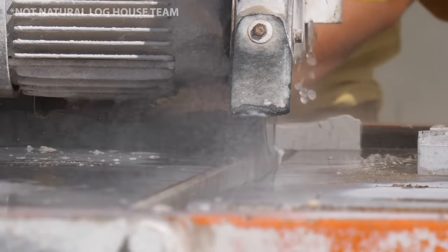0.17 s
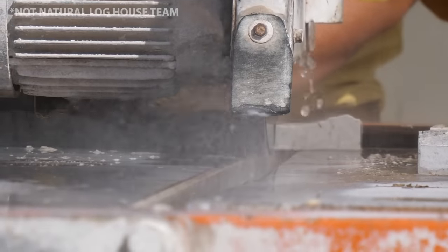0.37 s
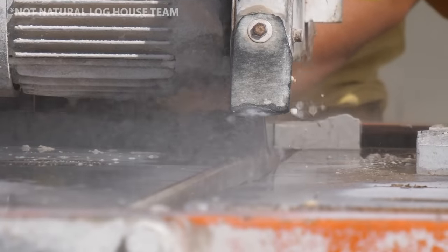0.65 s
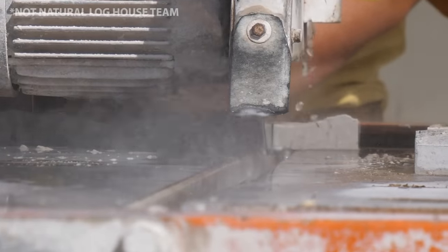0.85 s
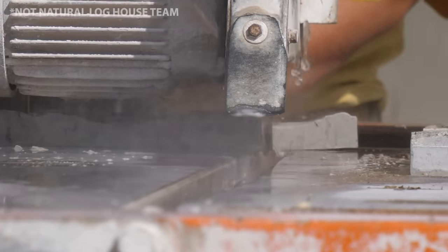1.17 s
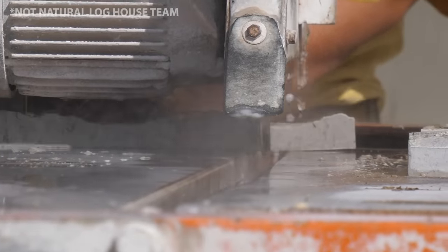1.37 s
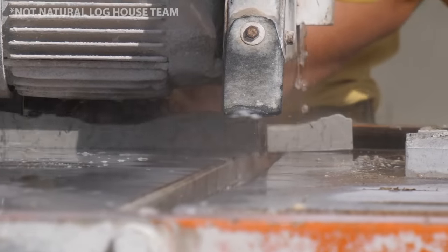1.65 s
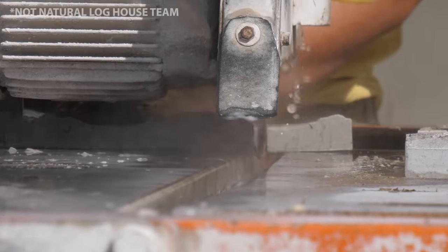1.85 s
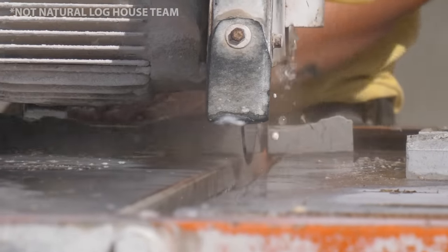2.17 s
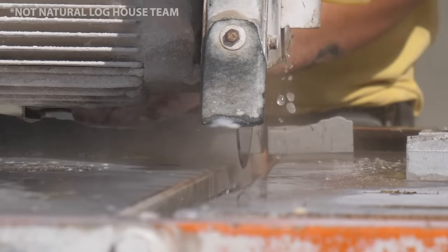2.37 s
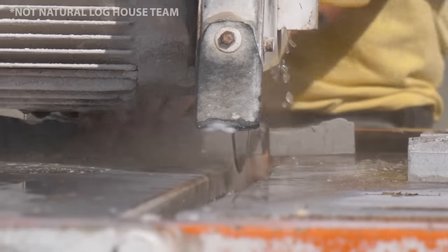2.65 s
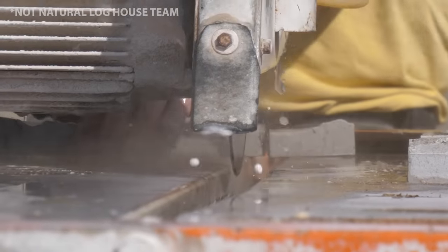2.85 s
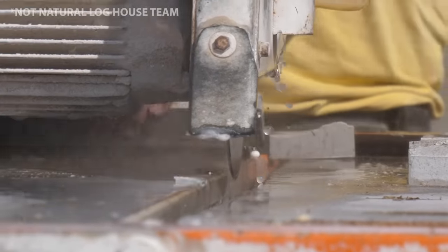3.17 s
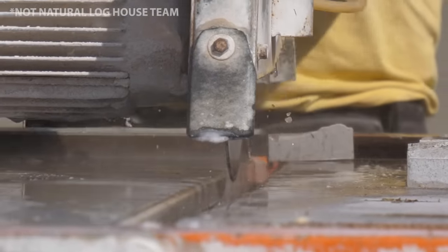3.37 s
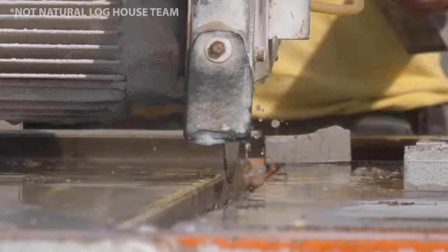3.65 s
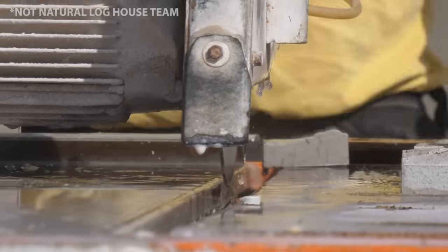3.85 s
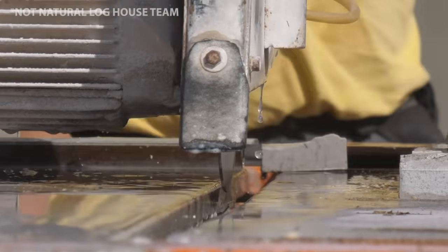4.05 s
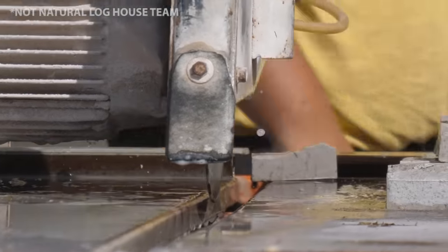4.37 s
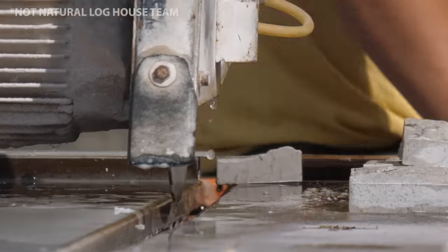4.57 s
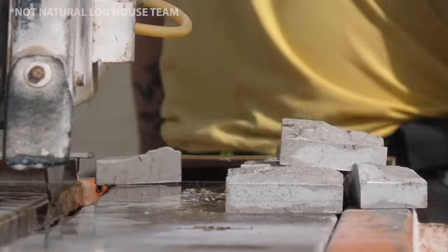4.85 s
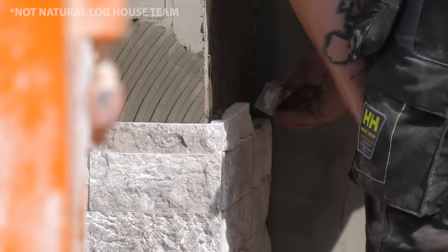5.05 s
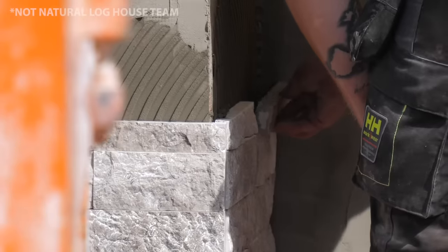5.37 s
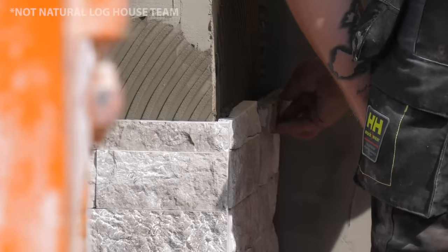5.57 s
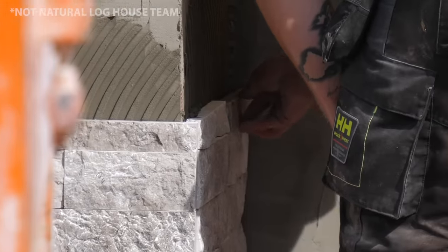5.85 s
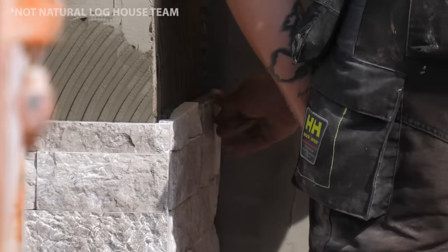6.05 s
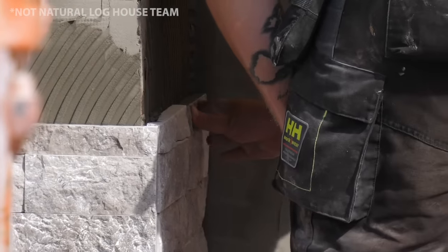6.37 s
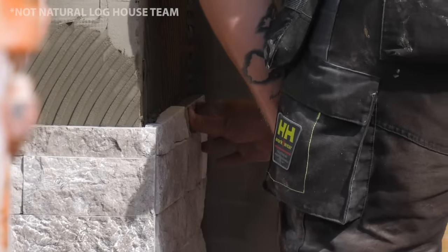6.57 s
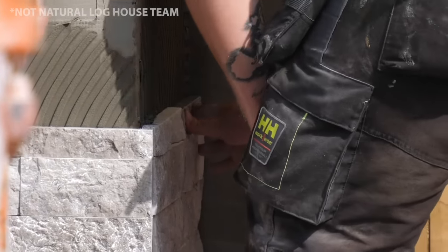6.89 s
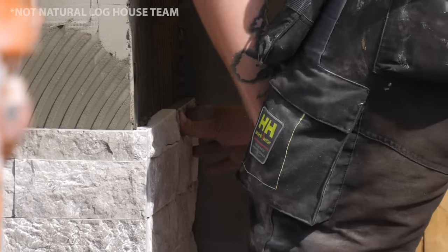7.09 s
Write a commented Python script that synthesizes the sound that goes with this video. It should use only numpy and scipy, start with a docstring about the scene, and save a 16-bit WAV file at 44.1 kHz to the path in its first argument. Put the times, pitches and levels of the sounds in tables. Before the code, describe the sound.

A wet tile saw hisses and rings through two stone cuts, with a short idle, a knock and wind between them.

```python
"""Outdoors, a wet tile saw. It grinds under load, the blade runs out ringing and idles in its spray,
stone knocks on the tray, then a second, shriller cut drags the shaft speed down and ends. Grit under
the rim hisses and rings the blade; motor, belt and rim slots hum at multiples of the shaft speed.
Wind buffets the microphone ports, and a far hum with faint tones is left."""
import sys
import numpy as np
from scipy import signal
from scipy.fft import rfft, irfft, next_fast_len
from scipy.io import wavfile

SR = 44100
rng = np.random.default_rng(int(sys.argv[2]) if len(sys.argv) > 2 else 0)


def persist_wave(psi):
    """Save psi, clipped to +-1, as 16-bit WAV."""
    counts = np.round(np.clip(psi, -1, 1) * 32767).astype(np.int16)
    wavfile.write(sys.argv[1], SR, np.atleast_2d(counts).T)


N = 318402
TIME = np.arange(N) / SR
IDLE, SECOND_CUT = 2, 3   # saw stages; 0 is the first cut, 1 the run-out
# shaft speed: t/s, speed/(turns/s)
SHAFT_SPEED = [(1.18, 48.83), (1.24, 49.66), (1.9, 49.68), (2.1, 49.85), (3.08, 49.85), (3.27, 64.3),
               (3.45, 65.5), (3.6, 64.0), (4.05, 57.7), (4.5, 52.0), (4.85, 48.8), (5.26, 49.2),
               (5.29, 42.3), (5.55, 42.4), (5.7, 45), (6.2, 45.2)]
# grinding envelope, per stage: t/s, level/dB
GRINDING = [
    [(0, -27.5), (1.2, -29.5)],
    [(1.2, -27.5), (1.88, -28), (1.97, -36), (2.06, -45)],
    [(2.06, -43), (2.4, -35.5), (3.04, -32.5), (3.1, -38.5)],
    [(3.1, -39), (3.26, -39), (3.285, -33.5), (3.65, -30), (3.9, -29.5), (3.925, -26.5), (4.1, -29),
     (5.62, -28.5), (5.73, -30), (6.0, -28.5), (6.08, -40), (6.17, -56.5), (6.45, -74)],
]


def amp(db):
    """dB to gain."""
    return 10 ** (np.asarray(db) / 20)


def unit_rms(x):
    """Scale to rms 1."""
    return x / np.sqrt(np.mean(x ** 2) + 1e-20)


def at_time(points, t, **ends):
    """Read a curve on a linear time axis."""
    return np.interp(t, *np.transpose(points), **ends)


def at_hz(points, hz):
    """Read a spectrum on a log-frequency axis."""
    points_hz, values = np.transpose(points)
    return np.interp(np.log(hz), np.log(points_hz), values)


def drift(rate_hz, size):
    """Slow random wander, rms about 1: coarse noise through a double one-pole low-pass."""
    hop, settle = 40, 2000
    r = np.exp(-2 * np.pi * rate_hz * hop / SR)
    slow = signal.lfilter([1], [1, -2 * r, r * r], rng.standard_normal(size // hop + settle + 2))[settle:]
    return np.interp(np.arange(size) / hop, np.arange(len(slow)), unit_rms(slow))


def bandpass(x, hz, width_hz):
    """Two-pole band-pass, peak gain 1."""
    r = np.exp(-np.pi * width_hz / SR)
    poles = [1, -2 * r * np.cos(2 * np.pi * hz / SR), r * r]
    return signal.lfilter([1, 0, -1], poles, x) * (1 - r * r) / 2


def resonance(x, hz, width_hz):
    """Band-pass scaled to rms 1."""
    return unit_rms(bandpass(x, hz, width_hz))


def spread(mid, side, hz):
    """Left and right from a shared and an opposed part."""
    # left-right likeness: f/Hz, correlation
    likeness = [(40, 1), (500, 0.97), (1500, 0.84), (8000, 0.89), (13000, 0.73)]
    # balance: f/Hz, left minus right/dB
    lean = [(700, -0.7), (2500, 0.3)]
    alike, sign = at_hz(likeness, hz), np.array([[1], [-1]])
    pair = np.sqrt((1 + alike) / 2) * mid + np.sqrt((1 - alike) / 2) * side * sign
    return amp(sign * at_hz(lean, hz) / 2) * pair


def coloured(white, spectrum, flicker_db, tilt_db_oct):
    """Shape two noises to a spectrum, in overlapping half-octave stereo bands that flicker."""
    size = white.shape[-1]
    padded = next_fast_len(size)
    bins_hz = np.arange(1, padded // 2 + 2) * SR / padded
    shaped = rfft(white, padded) * amp(at_hz(spectrum, bins_hz))
    out, common = 0, drift(1.07, size)
    for hz in 45 * 2 ** np.arange(0, 9, .5):
        share = np.cos(np.pi * np.clip(np.log2(bins_hz / hz), -.5, .5)) ** 2   # neighbours sum to 1
        band = irfft(shaped * share, padded)[:, :size]
        gain_db = tilt_db_oct * np.log2(max(hz, 800) / 3000)
        gain_db += flicker_db * (.89 * common + drift(17, size))
        out = out + amp(gain_db) * spread(*band, hz)
    return out / np.std(irfft(shaped[0], padded))


def rim_grit(stage, turns):
    """Grit under the rim: partly fresh, partly the same bumps each turn."""
    # repeating share of the power, per stage
    repeat = [.5, .45, .35, .65]
    count = 1200
    bumps = rng.standard_normal((2, 2, count))
    under = (turns % 1 * count).astype(int)
    wear_rad = 2.25 * drift(.393, len(turns))   # one bump pattern wears into another
    same = np.cos(wear_rad) * bumps[0][:, under] + np.sin(wear_rad) * bumps[1][:, under]
    fresh = rng.standard_normal((2, len(turns)))
    return np.sqrt(repeat[stage]) * same + np.sqrt(1 - repeat[stage]) * fresh


def grit_hiss(stage, grit, speed_hz, drop_db):
    """Grit and spray hiss: duller as the grinding drops, brighter as the second cut slows the shaft."""
    # hiss spectrum, per stage: f/Hz, relative density/dB
    spectra = [
        [(60, -36), (150, -11), (400, -6.5), (1000, -4), (2600, -7.5), (3300, -1), (5900, -4.5), (10500, -6),
         (15000, -19.5)],
        [(100, -52), (300, -22.5), (1000, -15.5), (1300, -6.5), (2600, -12), (3300, 0.5), (5900, -6),
         (10500, -5), (15000, -21)],
        [(80, -52), (250, -8), (450, -5.5), (800, -3.5), (3000, -4), (6000, -10.5), (11000, -8.5),
         (15000, -18.5)],
        [(100, -58), (400, -8), (850, 4), (2300, 6), (3000, 4), (6500, 1.5), (10500, 4.5), (15000, -4.5)],
    ]
    # treble tilt at full grinding level, per stage: dB/oct
    full_tilt = [1, 0.2, 0.14, 0.38]
    # tilt lost per dB of drop, per stage: dB/oct/dB
    dulling = [.05, 0.68, 0.21, 0.15]
    last = stage == SECOND_CUT
    labour_db_oct = last * .0413 * (speed_hz.mean() - speed_hz)
    tilt_db_oct = full_tilt[stage] + labour_db_oct - dulling[stage] * np.minimum(drop_db, 15)
    return amp(-2.5) * coloured(grit, spectra[stage], 1.13 + .25 * last, tilt_db_oct)


def idle_swell_db(stage, t, hz):
    """At idle the ring near one pitch swells, then passes from just above it to just below."""
    pivot_hz, peak_s, slope_db_s = 3550, 2.82, 11
    if stage != IDLE or abs(pivot_hz - hz) >= 350:
        return 0
    swell_db = 2 - slope_db_s * np.abs(np.maximum(t, 2.4) - peak_s)
    handover_db = 2 * np.tanh((t - peak_s) / .08)
    return swell_db + np.sign(pivot_hz - hz) * handover_db


def blade_ring(stage, t, grit, drop_db):
    """Grit drives the blade modes; each waxes and wanes."""
    # blade modes: f/Hz, width/Hz, then relative level/dB in each of the four stages
    modes = [(1143.6, 18, -44, -15, -23, -44), (2338, 12, -58, -46, -47, -15),
             (2392, 18, -60, -49, -40, -14.5), (2494, 16, -51, -42, -40, -19),
             (3311, 14, -18, -30, -40, -50), (3368, 18, -15, -21, -26, -57), (3470, 14, -19, -19, -28, -56),
             (3580, 14, -19, -19, -28, -50), (3730, 90, -18, -18, -21, -46), (4495, 55, -13, -16, -27, -40),
             (5300, 60, -21, -26, -32, -30), (5615, 20, -28, -21, -36, -45), (6175, 45, -18, -20, -32, -48),
             (9530, 360, -29, -37, -24, -24)]
    # higher, weaker modes: f/Hz
    upper_hz = [7840, 8400, 8400, 9240, 11500, 12740]
    upper_modes = [(hz, 250, -31, -29, -38, -35) for hz in upper_hz]
    held_db = .26 * drop_db * (stage != SECOND_CUT)   # the ring drops less than the grinding
    out = 0
    for hz, width_hz, *stage_db in modes + upper_modes:
        level_db = stage_db[stage] + idle_swell_db(stage, t, hz) + held_db + 1.7 * drift(3, len(t))
        out += amp(level_db) * spread(*[resonance(g, hz, width_hz) for g in grit], hz)
    return out


def shaft_hum(stage, t, turns, mean_speed_hz, drop_db):
    """Motor, belt and rim slots hum at shaft multiples; the slot tones flare as the blade bites."""
    # hum lines, per stage: shaft multiple, level re grinding/dB
    lines = [
        [(4, -15), (6, -22.5), (12, -25.5), (13, -19), (17, -17.5), (24, -16), (26, -25), (34, -26)],
        [(4, -19), (70, -18), (26, -24), (30, -26), (77, -19), (87, -22), (89, -19), (91, -20), (101, -22)],
        [(4, -18), (15, -21), (18, -21), (22, -20), (23, -20), (26, -24), (51, -22), (54, -22.5), (68, -19),
         (70, -22), (72, -22), (74, -17), (75, -21), (78, -21), (85, -25)],
        [(15, -15.5), (17, -19), (19, -19), (24, -10.5), (48, -16), (72, -20), (96, -23)],
    ]
    # slot-tone squeal in the second cut, other lines follow only its dips: t/s, gain/dB
    squeal = [(3.25, -14), (3.28, 4), (3.44, 2), (3.7, 5), (3.77, -2), (4.2, -4), (4.42, 2), (4.56, 3),
              (4.82, -4), (4.9, 3), (5.03, 3), (5.08, -14), (5.26, -14), (5.32, -1), (6.0, -12)]
    # share of a grinding drop that the hum does not follow, per stage
    hold = [0.12, 0.38, 0.74, 0.082]
    # fade of the low multiples, per stage: dB/s (negative grows)
    fade_db_s = [-4.5, 45, -0.5, 5.5]
    # flutter depth, per stage: dB
    flutter_db = [1.5, 2.5, 2.5, 4.2]
    # slot-tone phase wander before and in the second cut: rad
    wander_rad = [.15, .55]
    slots, bite_s, bite_decay_s = 24, 3.272, .05
    last = stage == SECOND_CUT
    squeal_db = last * at_time(squeal, t)
    bite_db = 4 * (t > bite_s) * np.exp(-np.abs(t - bite_s) / bite_decay_s)
    out = 0
    for order, db in lines[stage]:
        hz = order * mean_speed_hz
        level_db = db + hold[stage] * drop_db + idle_swell_db(stage, t, hz)
        level_db += squeal_db if order == slots else np.minimum(squeal_db, 0)
        if order < (slots if last else 10):
            level_db -= fade_db_s[stage] * (t - GRINDING[stage][0][0])
        if order % slots == 0:
            level_db += bite_db
        depth_db = flutter_db[stage] / (2 if last and order == slots else 1)
        level_db += depth_db * (.4 * drift(4, len(t)) + drift(14, len(t)))
        phase = 2 * np.pi * (order * turns + rng.random())
        phase += wander_rad[last] * order / slots * drift(20, len(t))
        out += np.sqrt(2) * amp(level_db) * spread(np.sin(phase), np.cos(phase), hz)
    return out


def guard(stage, x):
    """Sound off the blade guard cancels a few narrow bands, now more, now less."""
    # notches before and in the second cut: f/Hz
    notches_hz = [
        [2570, 4150, 5850, 6620],
        [3550, 4610, 5540],
    ]
    filled = 2 if stage == IDLE else 0   # the lowest two fill in at idle
    for hz in notches_hz[stage == SECOND_CUT][filled:]:
        depth = np.clip(.68 + .2 * drift(4, x.shape[1]), 0, 1)
        x = x - depth * bandpass(x, hz, width_hz=230)
    return x


def saw():
    """Hiss, ring and hum of one turning blade; its four stages cross-fade at equal power."""
    fade_s = .04
    speed_hz = at_time(SHAFT_SPEED, TIME)
    turns = np.cumsum(speed_hz) / SR
    out = np.zeros((2, N))
    for stage, envelope in enumerate(GRINDING):
        start_s, end_s = envelope[0][0], envelope[-1][0]
        span = (TIME > start_s - fade_s) & (TIME < end_s + fade_s)
        t = TIME[span]
        level_db = at_time(envelope, t)
        drop_db = max(db for _, db in envelope) - level_db
        grit = rim_grit(stage, turns[span])
        sound = grit_hiss(stage, grit, speed_hz[span], drop_db)
        sound += blade_ring(stage, t, grit, drop_db)
        sound += shaft_hum(stage, t, turns[span], speed_hz[span].mean(), drop_db)
        edge = np.clip(np.minimum(t - start_s, end_s - t) / fade_s + 1, 0, 2)
        edge[t < fade_s] = 2   # already cutting at t = 0
        out[:, span] += guard(stage, sound) * amp(level_db) * np.sin(np.pi / 4 * edge)
    return out


def far_machinery():
    """Steady far machinery and air, coming up as the recorder's automatic gain recovers after the saw."""
    # hum spectrum: f/Hz, relative density/dB
    spectrum = [(250, 2.5), (450, -1), (1000, 6.5), (2500, 2), (3300, -7.5), (4400, -3),
                (7000, -12.5), (10500, -11), (15000, -23)]
    # faint wavering tones: f/Hz, level at full gain/dB
    lines = [(565, -70), (1448, -71), (2605, -71), (4091, -74), (4430, -70), (5185, -79)]
    white = rng.standard_normal((2, N))
    tones = sum(amp(db) * spread(*[resonance(w, hz, width_hz=22) for w in white], hz) for hz, db in lines)
    recorder_gain_db = at_time([(5.9, -2.5), (6.82, 0)], TIME)   # the recovery, as a timed ramp
    hum = coloured(white, spectrum, flicker_db=2.5, tilt_db_oct=-recorder_gain_db / 2)
    return amp(recorder_gain_db) * (amp(-56.5) * hum + tones)


def wind():
    """Lumpy low noise on the microphone ports, and gusts that push them into a few slow swings."""
    # steady wind: t/s, level/dB
    steady = [(1.85, -72), (2.0, -51.5), (2.9, -50.5), (3.6, -55), (4.3, -76.5), (5.5, -78), (5.8, -62),
              (7.22, -66)]
    # main gusts: t/s, peak/dB, swing f/Hz
    main_gusts = [(2.925, -26, 172), (3.071, -30.5, 149), (3.11, -32.5, 168), (3.157, -37.5, 196),
                  (6.216, -46.5, 168), (6.476, -45, 182), (6.683, -44, 133), (7.127, -43, 119)]
    centre_hz, width_hz, floor_hz = 153, 115, 93
    rumble = [resonance(resonance(white, centre_hz, width_hz), centre_hz, 1.17 * width_hz)
              for white in rng.standard_normal((2, N))]
    rumble = signal.sosfilt(signal.butter(2, floor_hz, "high", fs=SR, output="sos"), rumble)
    out = spread(*rumble, centre_hz) * amp(at_time(steady, TIME, left=-100) + 7 * drift(4.8, N))
    when, pitch = rng.random((30, 2)).T   # small random gusts
    small_s = np.interp(when, [0, 1], [steady[0][0], N / SR])
    small_hz = np.interp(pitch, [0, 1], [115, 200])
    gusts = main_gusts + list(zip(small_s, at_time(steady, small_s) + 9, small_hz))
    t = np.arange(int(.2 * SR)) / SR
    for start_s, peak_db, hz in gusts:
        phase_turns, rise_s = rng.random(), rng.uniform(.0021, .0131)
        envelope = t / rise_s * np.exp(1 - t / rise_s)
        swing = np.sin(2 * np.pi * (hz * t * (1 - 2 * t) + phase_turns))   # slows as it dies
        at = round(start_s * SR)
        out[:, at:at + len(t)] += (amp(peak_db) * envelope * swing)[:N - at]
    return out


def tray_knocks():
    """Stone on the tray: a short gritty contact rings the tray modes."""
    # knocks: t/s, level/dB, tilt/(dB/oct)
    knocks = [(2.944, -28.5, 0), (3.065, -37, 7), (6.892, -60, 1), (7.167, -53.5, 9.5)]
    # tray modes: f/Hz, level/dB, t60/s
    modes = [(690, 1, .05), (980, 1, .05), (2050, -4, .03), (2600, -4, .03), (3900, -7, .025)]
    out, t = np.zeros(N), np.arange(int(.15 * SR)) / SR
    for start_s, level_db, tilt_db_oct in knocks:
        contact = resonance(resonance(rng.standard_normal(len(t)), 2200, 2500), 2800, 3000)
        hit = contact * np.exp(-t / .019) * amp(-6 + tilt_db_oct)
        for hz, db, t60_s in modes:
            mode_db = db + tilt_db_oct * np.log2(hz / 1500) - 60 * t / t60_s
            hit += amp(mode_db) * np.sin(2 * np.pi * (hz * t + rng.random()))
        at = round(start_s * SR)
        out[at:at + len(t)] += amp(level_db) * hit[:N - at]
    return out


def run_up_whine():
    """One shaft multiple slides up as the shaft speeds up before the blade bites."""
    order, start_s, end_s, edge_s = 15, 3.12, 3.25, .02
    turns = np.cumsum(at_time(SHAFT_SPEED, TIME)) / SR
    gate = np.clip(np.minimum(TIME - start_s, end_s - TIME) / edge_s + 1, 0, 1)
    return gate * amp(-48 + 3 * drift(16, N)) * np.sin(2 * np.pi * order * turns)


def scene():
    """All sources, in stereo."""
    return saw() + run_up_whine() + wind() + tray_knocks() + far_machinery()


def record(dry):
    """The microphone loses the deep bass; the top is cut steeply."""
    low_hz, top_hz = 70, 15600
    thin = signal.sosfilt(signal.butter(2, low_hz, "high", fs=SR, output="sos"), dry)
    return signal.sosfilt(signal.cheby2(24, 70, top_hz, fs=SR, output="sos"), thin)


dry = scene()
out = record(dry)
persist_wave(out)
```